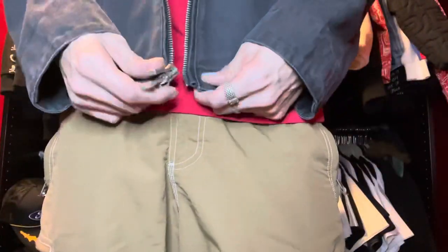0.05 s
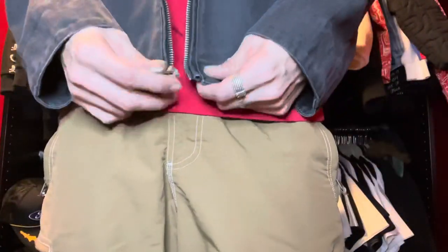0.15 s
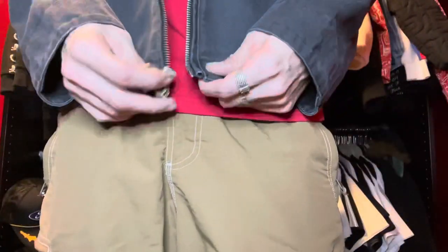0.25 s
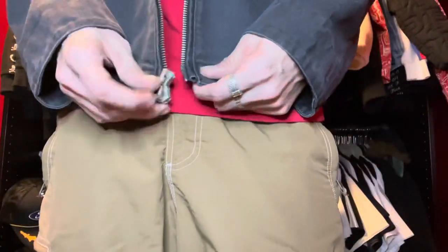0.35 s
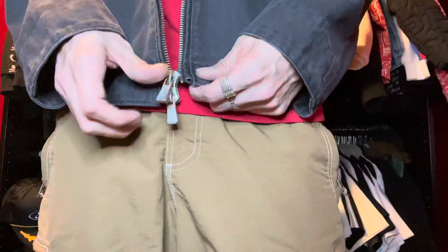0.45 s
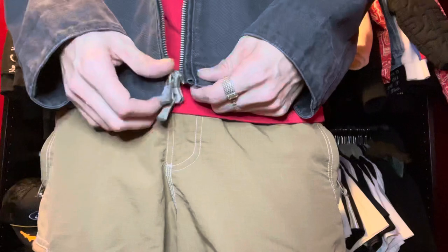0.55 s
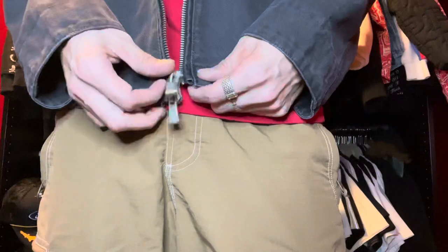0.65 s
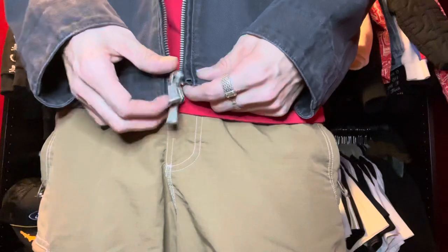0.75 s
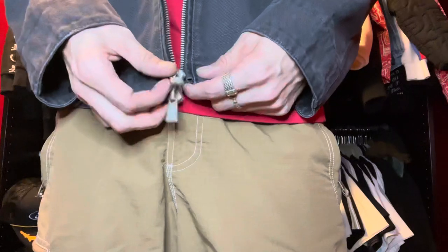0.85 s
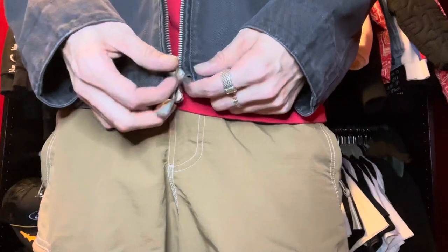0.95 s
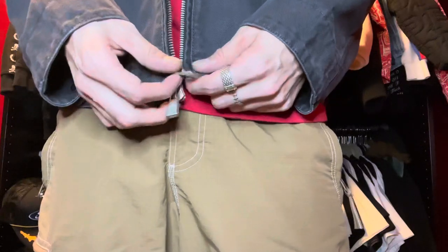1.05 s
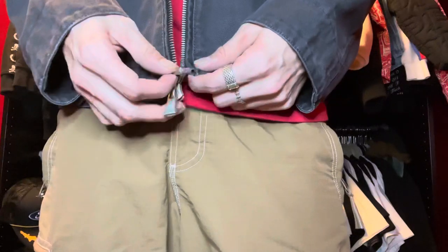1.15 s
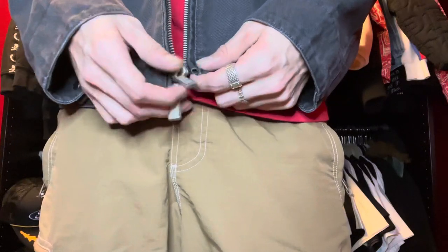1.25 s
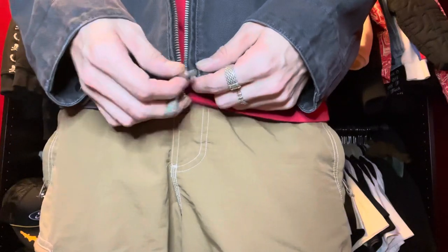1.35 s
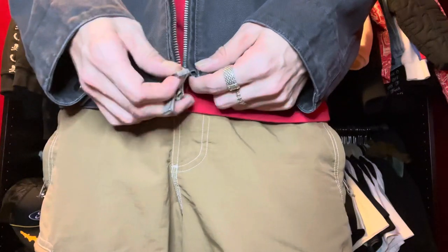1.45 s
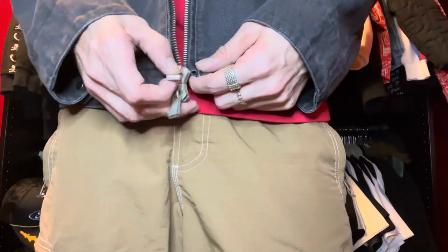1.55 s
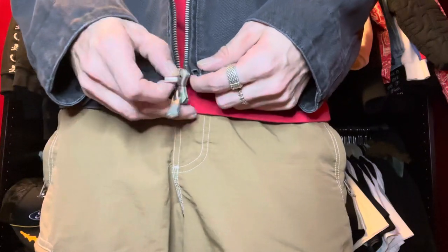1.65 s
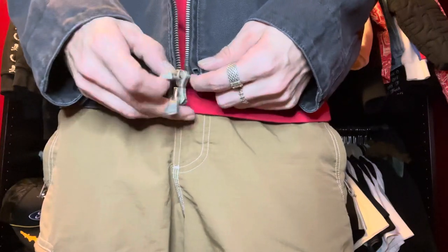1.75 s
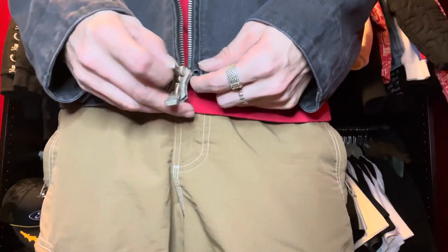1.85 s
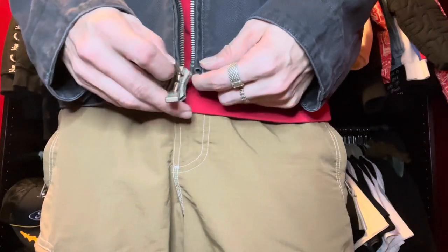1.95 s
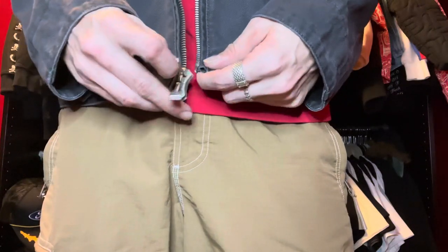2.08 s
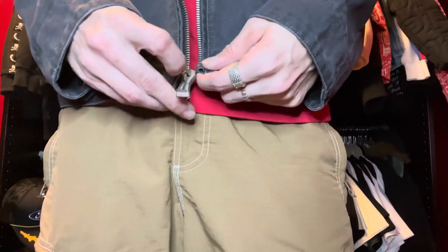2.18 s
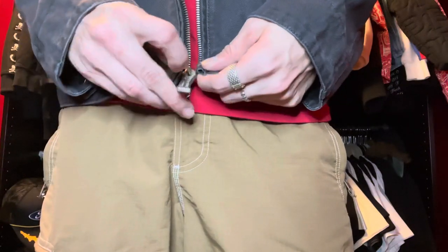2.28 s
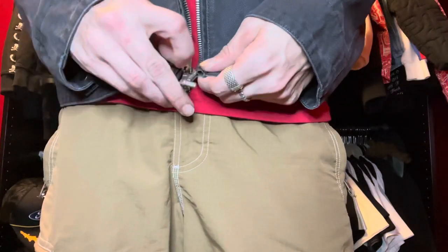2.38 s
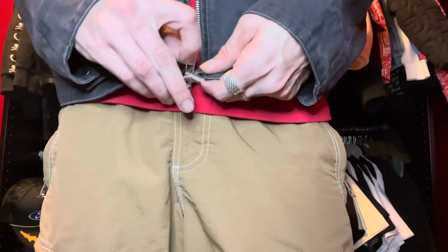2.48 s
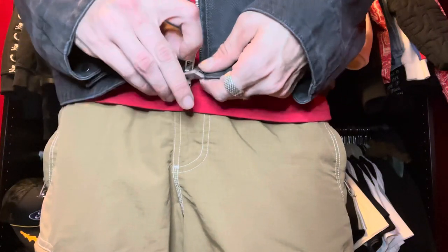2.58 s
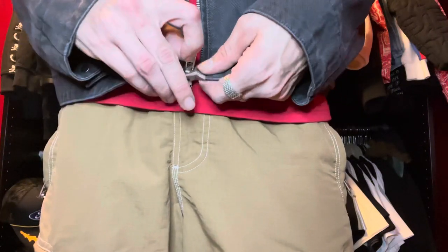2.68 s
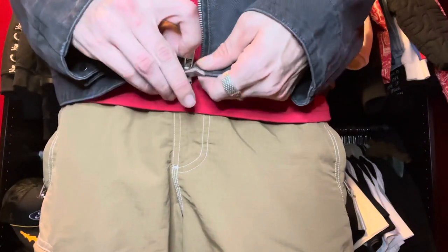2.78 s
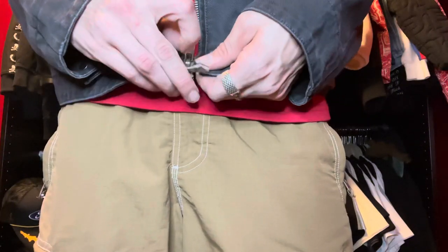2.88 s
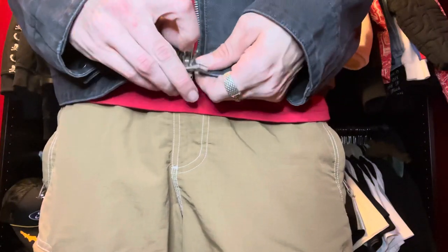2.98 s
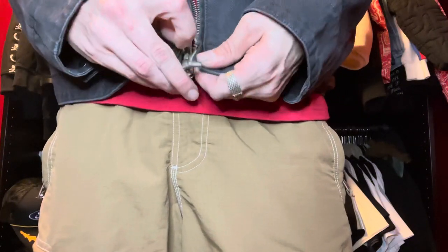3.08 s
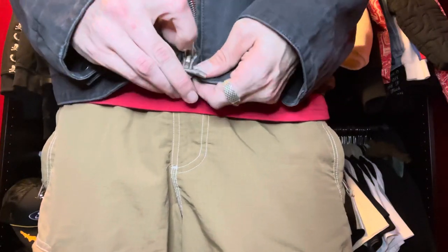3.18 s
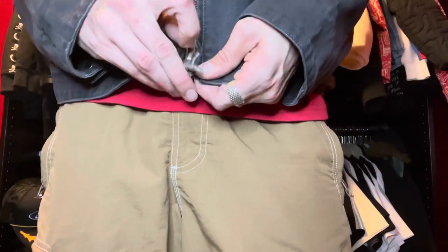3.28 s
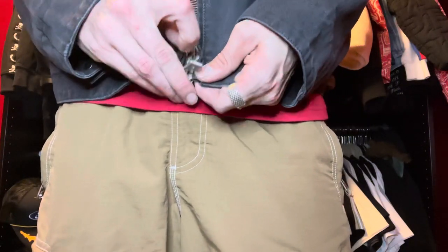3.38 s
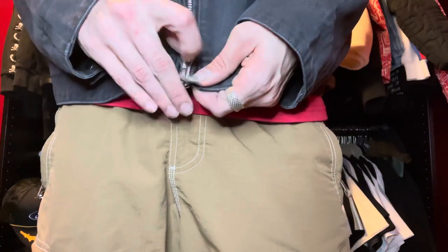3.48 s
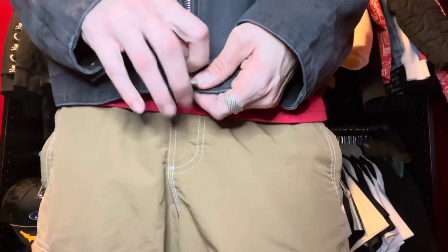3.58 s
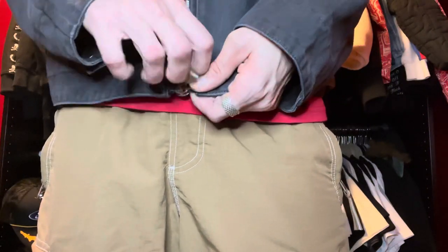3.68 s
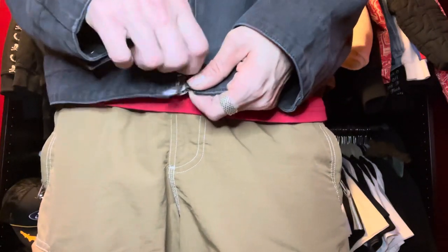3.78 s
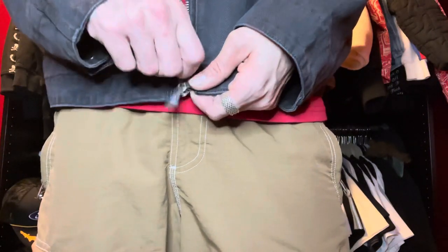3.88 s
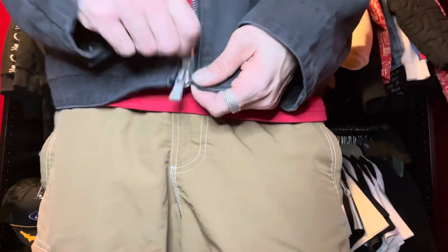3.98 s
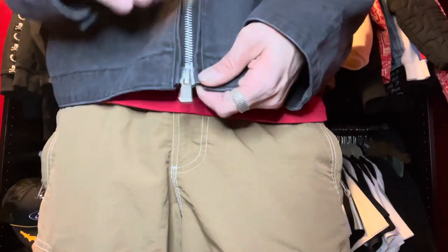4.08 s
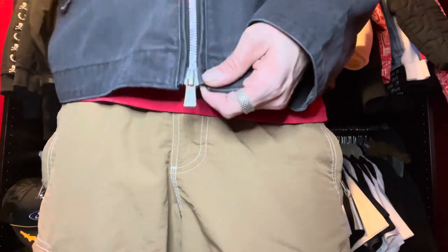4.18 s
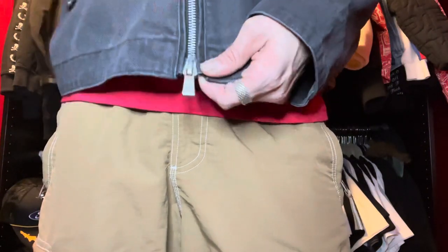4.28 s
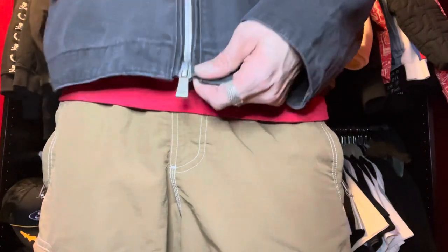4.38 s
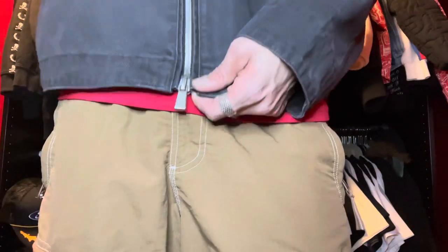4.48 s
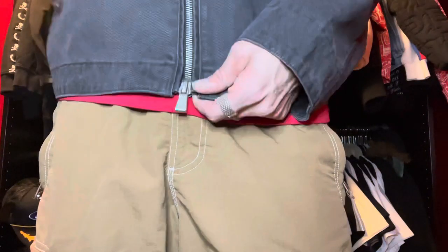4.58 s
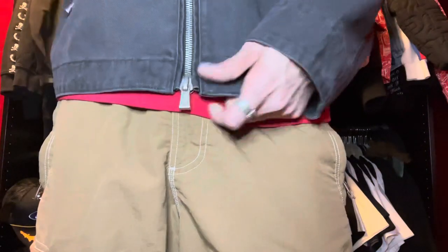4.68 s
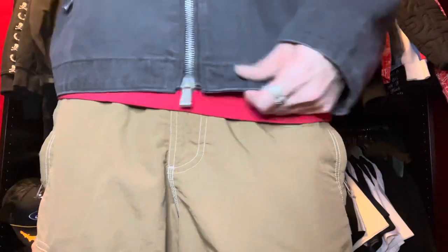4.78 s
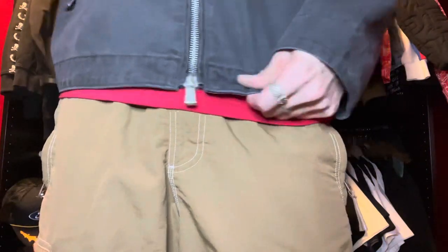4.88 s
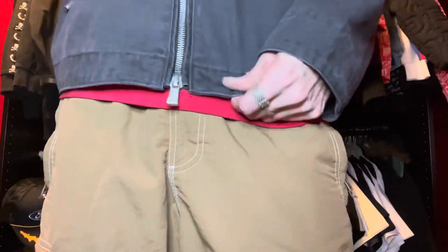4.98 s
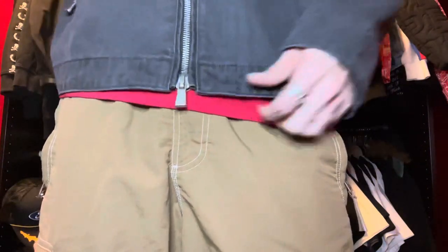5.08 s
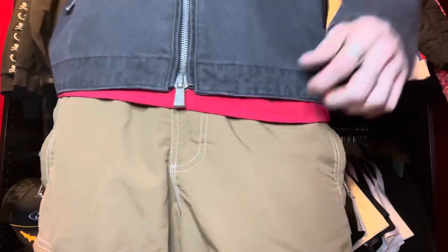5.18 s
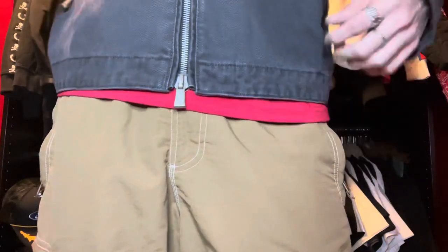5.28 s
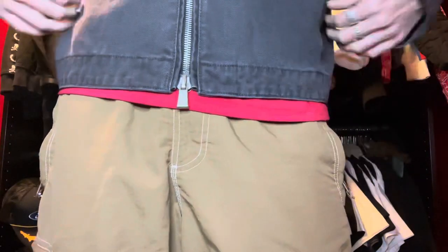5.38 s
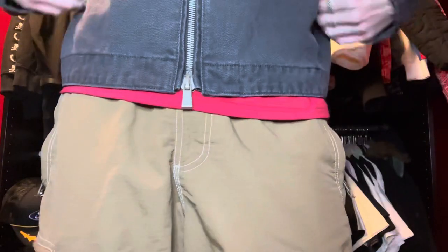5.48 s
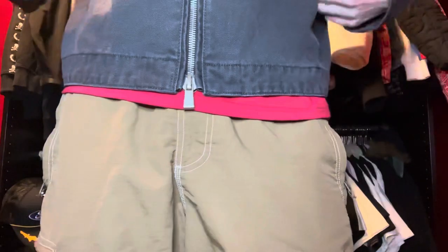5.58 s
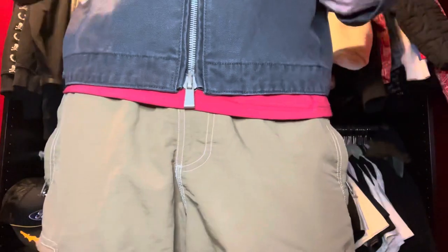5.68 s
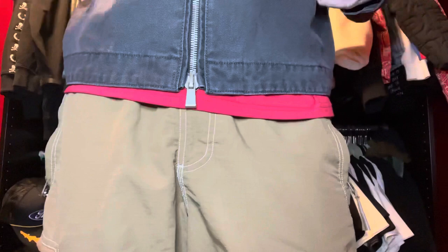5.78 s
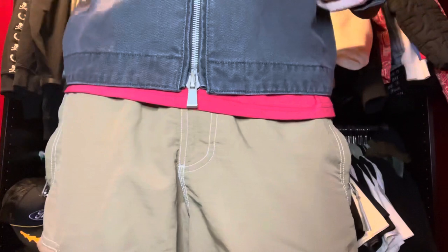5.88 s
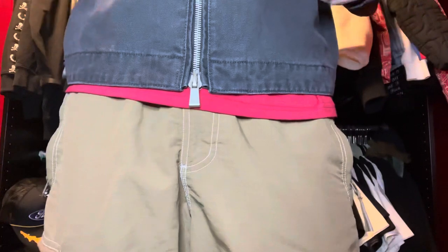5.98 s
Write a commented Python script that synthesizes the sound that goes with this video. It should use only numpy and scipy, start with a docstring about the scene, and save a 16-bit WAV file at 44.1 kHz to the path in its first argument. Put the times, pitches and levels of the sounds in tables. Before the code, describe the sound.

Small metal parts tick, snap and chatter against each other while heavy canvas rustles lightly. After a quiet stretch, blunt knocks and a firm click seat the pin, more clicks follow, and the zipper is pulled up in a single grainy buzz, the taut cloth droning under it. Hands then let go with brushing sleeves and soft hem flaps. Very close stereo microphone, dry indoor space, low rumble and faint hiss.

```python
"""A thick metal jacket zipper is pulled shut in one stroke: its teeth buzz through the taut canvas.
Each tooth pushes on the resonant canvas and tape and lets out a burst of filtered scraping noise.
Before and after, hands fit and settle the parts: pin, slider and pull tabs click as ringing modes.
Noise shaped by strokes makes sleeves rustle; knocks and scuffs set the canvas ringing.
A small, dead room with a low hum, heard by a close pair of microphone ports."""
import sys
import numpy as np
from scipy import signal
from scipy.fft import rfft, irfft
from scipy.io import wavfile
from scipy.ndimage import uniform_filter1d

SR = 44100
rng = np.random.default_rng(int(sys.argv[2]) if len(sys.argv) > 2 else 0)


def int16_out(signal):
    """Quantize to a 16-bit WAV file."""
    q = np.round(np.clip(np.atleast_2d(signal).T, -1, 1) * 32767)
    wavfile.write(sys.argv[1], SR, q.astype(np.int16))


N = 266540
TIME = np.arange(N) / SR


def amp(db):
    """Decibels to gain."""
    return 10 ** (np.asarray(db) / 20)


def unit(x):
    """Scales to an rms of 1."""
    return x / np.sqrt(np.mean(x ** 2) + 1e-20)


def struck(hit):
    """Scales a hit so that its energy, packed into 3 ms, has an rms of 1."""
    return unit(hit) * np.sqrt(.003 * SR / len(hit))


def read(points, hz):
    """Reads a table on a log-frequency axis."""
    f, value = np.transpose(points)
    return np.interp(np.log(hz + 1), np.log(f + 1), value)


def add(mix, s, sound):
    """Mixes a sound in at s seconds."""
    part = mix[max(round(s * SR), 0):][:len(sound)]
    part += sound[:len(part)]


def colour(x, points, size=4096):
    """Causal (minimum-phase) filter with the given spectrum."""
    log_gain = np.log(amp(read(points, abs(np.fft.fftfreq(size, 1 / SR)))))
    taps = np.fft.ifft(np.exp(np.conj(signal.hilbert(log_gain)))).real[:size // 2]
    return signal.fftconvolve(x, taps)[:len(x)]


def resonate(x, hz, width_hz):
    """One band-pass resonance of gain 1."""
    return signal.lfilter(*signal.iirpeak(hz, hz / width_hz, SR), x)


def resonate_twice(x, hz, width_hz):
    """The same resonance passed twice, for steeper sides."""
    return resonate(resonate(x, hz, width_hz), hz, width_hz)


def drift(per_s):
    """Smooth chance of rms 1, with per_s new values a second."""
    knots = rng.standard_normal(N // 8)
    return unit(np.interp(TIME * per_s, np.arange(len(knots)), knots))


def swells(rows):
    """Gain over time from bell-shaped swells."""
    return sum(amp(db) * np.exp(-.5 * ((TIME - s) / length) ** 2) for s, db, length in rows)


# spectrum of the still air: (frequency [Hz], level [dB])
AIR_SPECTRUM = [(20, 0), (40, -7), (58, 4.5), (100, -5.5), (160, -14.5), (280, -24), (550, -27),
                (1000, -30.5), (2000, -32.5), (4000, -41.5), (9000, -42), (16000, -69)]
HUM_HZ, HUM_DB = 87, -62


def background(air_db=-65, apart=0.82):
    """Low rumble with faint hiss, partly shared by both ports, and a slightly wavering hum."""
    shared, left, right = (unit(colour(rng.standard_normal(N), AIR_SPECTRUM)) for _ in range(3))
    air = amp(air_db) * (shared + apart * np.array([left, right]))
    phase = 2 * np.pi * np.cumsum(HUM_HZ + .8 * drift(6)) / SR
    hum = np.sin(phase) * amp(1.3 * drift(5))
    return air + amp(HUM_DB) * unit(hum)


# decay of the room: (frequency [Hz], time to fall 60 dB [s])
ROOM_DECAY = [(100, 0.51), (600, 0.17), (2000, 0.11), (6000, 0.14), (15000, 0.14)]


def room(x, first_s=.004):
    """Sparse reflections, quickly soaked up by hanging clothes."""
    taps = rng.choice([-1., 1.], (2, SR // 3)) * (rng.random((2, SR // 3)) < 4000 / SR)
    taps *= np.arange(SR // 3) > first_s * SR
    hz, t, z = signal.stft(taps, SR, nperseg=256)
    fade = amp(-60 * t / read(ROOM_DECAY, hz)[:, None])  # each band dies away at its own pace
    tail = signal.istft(z * fade, SR)[1]
    return signal.fftconvolve(x[None], tail / np.linalg.norm(tail[0]), axes=1)[:, :N]


def moving(x, echo, count=3, round_s=0.33):
    """The hands keep moving, so the sound passes in turn through a few different sets of reflections."""
    turn = TIME / round_s
    return sum(np.sqrt(2 / count) * echo(x * np.cos(np.pi * (turn + k / count))) for k in range(count))


def scatter(x):
    """Hands, sleeves and body throw sound back within milliseconds, in opposite polarity at the ports."""
    t, t60 = np.arange(SR // 50) / SR, .011
    taps = rng.standard_normal((2, len(t))) * amp(-60 * t / t60)
    taps = taps[0] - taps[1]
    echo = signal.fftconvolve(x, taps / np.linalg.norm(taps))[:N]
    return np.array([echo, -echo]) / np.sqrt(2)


# phase gap between the two ports: (frequency [Hz], lead of the left [rad])
PORT_LEAD = [(0, 0), (600, -.5), (2600, -.7), (4600, -1.5), (5500, -2.3), (5900, -4.2), (6700, -5.6),
             (7700, -6.1), (9700, -4.1), (10700, -3.25), (11700, -3.05), (12500, -2), (13900, -.3),
             (16000, 0)]


def ports(x):
    """Direct sound reaches the two ports with a phase gap that depends on frequency."""
    lead = np.interp(np.fft.rfftfreq(N, 1 / SR), *np.transpose(PORT_LEAD))
    return irfft(rfft(x) * np.exp(.5j * np.array([lead, -lead])), N)


# strokes of sleeves and hands over the jacket:
# (time of peak [s], brushing level [dB], heavy fold level [dB], rise [s], fall [s])
CLOTH_STROKES = [(0.11, -58.5, -67.5, 0.052, 0.11), (0.38, -62, -67, 0.014, .05),
                 (0.47, -52.5, -64, 0.016, 0.039), (0.66, -69.5, -65, 0.39, 0.26),
                 (0.9, -65, -75, 0.18, 0.14), (1.22, -71, -80, 0.45, .08), (1.85, -84, -80, 0.47, 0.14),
                 (2.43, -66.5, -72, 0.088, 0.066), (3.0, -69.5, -70, .05, .04),
                 (3.22, -67, -64.5, 0.037, 0.11), (3.45, -59, -63.5, 0.045, 0.31),
                 (3.765, -53, -62.5, 0.089, 0.015), (3.929, -59, -56, 0.045, 0.019),
                 (4.5, -67.5, -70.5, 0.14, 0.18), (4.739, -50, -56, 0.09, 0.049),
                 (4.81, -54.5, -53.5, 0.039, 0.093), (5.035, -50, -58.5, 0.053, 0.033),
                 (5.199, -61, -60.5, 0.058, 0.052), (5.33, -56.5, -55.5, 0.12, 0.085),
                 (5.47, -54, -56.5, 0.062, .15), (5.729, -53.5, -54, 0.072, 0.019),
                 (5.859, -53.5, -55, 0.039, 0.038), (5.97, -56.5, -57, 0.081, 0.18)]
# spectrum of canvas brushing on canvas: (frequency [Hz], level [dB])
BRUSH_SPECTRUM = [(300, -2.5), (900, 2), (2000, 6.5), (3500, 2), (7000, 1.5), (9400, -1.5), (12500, -3.5),
                  (16000, -7)]
# spectrum of shifting folds: (frequency [Hz], level [dB])
FOLD_SPECTRUM = [(40, -6), (130, -8), (300, -13.5), (520, 11), (750, 1), (1100, 2.5), (2000, -7),
                 (5000, -30)]
STROKE_ROUNDNESS = 0.96  # 1 is a pointed swell, 2 a bell


def cloth(flutter_db=2.5, crumple_db=3, snags_per_s=220, snag_size=0.4):
    """With each stroke canvas brushes on canvas, single threads snag, and heavy folds shift."""
    brush_power, fold_power, t = 0, 0, TIME[::64]
    for s, brush_db, fold_db, rise, fall in CLOTH_STROKES:
        swell = np.exp(-np.maximum((s - t) / rise, (t - s) / fall) ** STROKE_ROUNDNESS)
        brush_power += (amp(brush_db) * swell) ** 2
        fold_power += (amp(fold_db) * swell) ** 2
    snags = rng.standard_normal(N) * rng.exponential(1, N) * (rng.random(N) < snags_per_s / SR)
    rub = rng.standard_normal(N) + snag_size * unit(snags)
    brush = unit(colour(rub * amp(flutter_db * drift(90)), BRUSH_SPECTRUM))
    folds = unit(colour(rub * amp(crumple_db * drift(110)), FOLD_SPECTRUM))
    brush_gain = np.interp(TIME, t, np.sqrt(brush_power))
    fold_gain = np.interp(TIME, t, np.sqrt(fold_power))
    return brush * brush_gain + folds * fold_gain


# the heavy hem is tugged or flaps: (time of peak [s], level [dB], length of bell [s])
HEM_FLAPS = [(4.1, -49, 0.045), (4.33, -52.5, 0.069), (4.81, -58.5, 0.046), (5.305, -53, 0.02),
             (5.35, -59.5, 0.051), (5.75, -50, 0.026), (5.97, -57.5, 0.027)]


def flaps(hz=105, width_hz=130):
    """Heavy cloth pushes a soft puff of air."""
    return swells(HEM_FLAPS) * unit(resonate_twice(rng.standard_normal(N), hz, width_hz))


# fingers and cuffs scuff the jacket:
# (time of peak [s], level [dB], length of bell [s], pitch of the cloth under them [Hz])
JACKET_SCUFFS = [(0.385, -56.5, 0.02, 807), (0.48, -56.5, 0.022, 835), (0.67, -60.5, 0.016, 894),
                 (1.80, -73, 0.018, 1040), (1.91, -78.5, .023, 1740), (2.42, -69.5, 0.046, 874),
                 (2.812, -55, 0.011, 860), (3.09, -51, 0.0047, 840), (3.205, -61, 0.0084, 920),
                 (3.234, -50, .007, 1700), (4.76, -59, 0.024, 910), (4.815, -48.5, 0.019, 580),
                 (5.728, -47.5, 0.013, 1540), (5.748, -43.5, 0.0044, 1410), (5.862, -45.5, 0.0044, 510),
                 (5.962, -53, 0.017, 1140), (5.97, -50.5, 0.02, 508)]
# spectrum of a blunt contact on canvas, for scuffs and knocks: (frequency [Hz], level [dB])
THUD_SPECTRUM = [(40, -11), (130, -2), (300, -8), (520, 8.5), (1000, 0), (2000, -8.5), (4000, -14.5),
                 (9000, -18.5)]


def scuffs(crumple_db=5.5, width_share=0.085, plain_db=-3):
    """Skin and cloth drag briefly over the canvas, which rings according to its tension."""
    t = np.arange(SR // 4) / SR - 1 / 8
    out, flutter = np.zeros(N), amp(crumple_db * drift(200))
    for k, (s, db, length, hz) in enumerate(JACKET_SCUFFS):
        drag = rng.standard_normal(len(t)) * flutter[k * len(t):][:len(t)]
        ringing = unit(resonate(drag, hz, hz * width_share))
        plain = unit(colour(drag, THUD_SPECTRUM))
        rub = unit(ringing + amp(plain_db) * plain)
        add(out, s + t[0], amp(db) * np.exp(-.5 * (t / length) ** 2) * rub)
    return out


# blunt knocks of fingers, slider and hem on the canvas:
# (time [s], level [dB], drum pitch [Hz], time for the scuff to fall 60 dB, at least 0.005 [s])
CANVAS_KNOCKS = [(0.457, -48, 640, 0.05), (1.746, -65.5, 470, .05), (2.082, -56, 810, 0.15),
                 (2.808, -48.5, 564, 0.12), (2.826, -48.5, 546, .02), (3.002, -60, 530, .08),
                 (3.088, -43, 910, 0.03), (3.1, -40, 984, 0.072), (3.226, -49, 930, 0.075),
                 (3.237, -39, 614, .022), (5.302, -41, 640, 0.035), (5.63, -57, 980, 0.022),
                 (5.724, -47, 1130, .025), (5.746, -40, 493, 0.035), (5.858, -48.5, 510, 0.038)]


def knocks(drum_width_hz=100, drum_db=2, snap_db=-3, snap_s=0.0064):
    """A blow snaps, scuffs and sets a patch of canvas drumming for a few cycles."""
    out, t = np.zeros(N), np.arange(SR // 8) / SR
    for s, db, hz, t60 in CANVAS_KNOCKS:
        scuff, snap = rng.standard_normal((2, len(t))) * amp(-60 * t / [[max(t60, .005)], [snap_s]])
        drum = np.sin(2 * np.pi * hz * t) * np.exp(-np.pi * drum_width_hz * t)
        blow = struck(colour(scuff, THUD_SPECTRUM))
        blow += amp(snap_db) * struck(colour(snap, THUD_SPECTRUM))
        blow += amp(drum_db) * struck(drum)
        add(out, s, amp(db) * blow)
    return out


# loose teeth graze the slider: (time of peak [s], level [dB], length of bell [s])
TOOTH_GRAZES = [(0.375, -54, 0.031), (0.47, -46, 0.014), (0.59, -56, .015), (0.825, -58, 0.0075),
                (0.88, -52.5, 0.009), (1.16, -59, 0.0056), (3.46, -62, 0.018), (3.56, -57.5, 0.0059),
                (3.72, -61, 0.031), (3.95, -48.5, 0.01)]
# modes of slider and pull tabs, for grazes and clicks, before the fingers damp and detune them:
# (frequency [Hz], level [dB], time to fall 60 dB [s])
METAL_MODES = [(3600, -10, 0.013), (5490, 3.5, 0.019), (6030, -8, 0.015), (7740, -16, 0.052),
               (8500, -15, 0.015), (8860, -10, 0.02), (9970, -11.5, 0.053), (12080, 1.5, 0.032),
               (12510, -3, 0.044), (14300, -24, 0.068), (15300, -29, 0.01)]
# spectrum of a metal contact, for grazes and clicks: (frequency [Hz], level [dB])
TICK_SPECTRUM = [(200, -20.5), (600, 5), (2000, -18), (4000, 5), (7000, -4), (9500, 9.5), (13000, 3.5),
                 (16000, 3)]


def grazes(ticks_per_s=500):
    """Many tiny metal ticks run together into a scratch."""
    ticks = rng.standard_normal(N) * (rng.random(N) < ticks_per_s / SR)
    ring = sum(amp(db) * resonate(ticks, hz, 8 / t60) for hz, db, t60 in METAL_MODES)
    return swells(TOOTH_GRAZES) * unit(unit(colour(ticks, TICK_SPECTRUM)) + 0.9 * unit(ring))


# metal touching metal: (time [s], level [dB], centre of the favoured ringing [Hz], low clack level [dB],
# ring level, high when the part hangs loose [dB]); clack and ring are relative to the click
METAL_CLICKS = [(0.0787, -39.5, 16000, -3.5, 0), (0.1349, -42.5, 14100, -35, -12),
                (0.144, -38.5, 5850, -17, -5), (0.2038, -41, 9800, -23, -12),
                (0.2929, -45.5, 13600, -24, -39), (0.3424, -39.5, 7150, -33, -3),
                (0.3573, -36.5, 6700, -14, -6), (0.3704, -36.5, 9500, -25, -4),
                (0.395, -38.5, 8600, -21, -6), (0.414, -44, 3830, -9, -13), (0.4457, -39, 9000, -24, -11),
                (0.4626, -42.5, 9600, -23, 4.5), (0.4742, -39.5, 4220, -32, -27),
                (0.6057, -43.5, 8900, -14.5, -19), (0.6364, -44.5, 8750, -12.5, 1),
                (0.6664, -36, 6200, -20, -6), (0.7016, -49, 8750, -12, -1),
                (0.7688, -42.5, 8100, -12, -1.5), (1.1881, -41, 12800, -20, 4.5),
                (1.2411, -47, 5900, -21, 5), (1.2955, -41.5, 13000, -15, -8),
                (1.2995, -38.5, 7300, -18, -7), (1.4857, -50.5, 4340, -5.5, -12),
                (1.59, -48, 13000, -23, 1), (1.6298, -41, 9500, -8, -17), (1.8487, -71, 15000, -13, -6),
                (1.941, -69, 9900, -10, 5), (2.0822, -54.5, 9900, -12, -1), (2.1185, -56, 8900, -9.5, -22),
                (2.807, -60, 3470, -8, -6), (2.8256, -48.5, 7700, -10, -19),
                (3.1017, -42.5, 4740, -10, -24), (3.1245, -49.5, 7100, -1.5, -1.5),
                (3.237, -32, 5570, -7.5, -35), (3.412, -56, 3830, 4, -2), (3.431, -57, 3540, 9.5, 0),
                (3.4979, -54.5, 3520, 3, -1), (3.6067, -47, 3330, -6.5, -2.5),
                (3.6407, -39.5, 10500, -24, -14), (3.6512, -53.5, 12200, -5, 11.5),
                (3.7025, -41, 8630, -28, -2), (3.7122, -53, 8440, -8, -24), (3.7506, -42.5, 8160, -10, -12),
                (3.8681, -35.5, 9200, -32, -5), (3.9096, -43.5, 7500, -10, -11),
                (3.9625, -39.5, 7760, 1.5, 0.5), (3.973, -39, 12200, -19, 3), (4.404, -57, 12800, -5, -15),
                (4.596, -50.5, 9870, -11, 0), (4.7873, -39.5, 8700, -10, -5.5),
                (5.4884, -51, 4250, -10, -13), (5.6999, -49.5, 3920, 1.5, -6)]
# a loose part chatters longer than one held tight: length at 0 dB of ring, dB of ring that double it
CHATTER_S, CHATTER_DOUBLES_DB = 0.027, 15.5


def clicks(clack_hz=2200, clack_width_hz=2400, focus_db=14, focus_octaves=0.26, rise_s=0.00038,
           vary_db=3, detune=0.023, free_db=-3, snap=3.9, bright=.9, slide_db=-13, slide_s=0.00075):
    """Each contact snaps, chatters briefly and rings the modes nearest to where it lands."""
    out, t = np.zeros(N), np.arange(SR // 8) / SR
    for s, db, hz, clack_db, ring_db in METAL_CLICKS:
        chatter = CHATTER_S * 2 ** (ring_db / CHATTER_DOUBLES_DB)
        force = rng.standard_normal(len(t)) * amp(-60 * t / chatter) * (1 - np.exp(-t / rise_s))
        force[SR // 1000] += snap  # the edges graze, then seat with one hard impulse
        edge = bright * amp(.5 * min(ring_db, 0)) * unit(resonate(force, hz, hz / 4))
        tick = unit(colour(force, TICK_SPECTRUM)) + edge
        clack = resonate_twice(force, clack_hz, clack_width_hz)
        loose = amp(min(ring_db - free_db, 0))  # a part held tight rings weakly and stops early
        ring = 0
        chances = rng.standard_normal((len(METAL_MODES), 3))
        for (f, mode_db, t60), (touch, shift, phase) in zip(METAL_MODES, chances):
            near = np.exp(-(np.log2(f / hz) / focus_octaves) ** 2)
            # fingers damp and detune the modes differently each time
            level_db = mode_db + focus_db * near + vary_db * touch
            fade_db = level_db - 60 * t / (t60 * loose * (.5 + .5 * near))
            ring += amp(fade_db) * np.sin(2 * np.pi * (f * t * (1 + detune * shift) + phase))
        click = struck(tick) + amp(ring_db) * struck(ring) + amp(clack_db) * struck(clack)
        add(out, s, amp(db) * click)
        # the parts slide into contact: noise that grows up to the click
        slide = (rng.standard_normal(len(t)) * np.exp(-t / slide_s))[SR // 50::-1]
        add(out, s - len(slide) / SR, amp(db + slide_db) * struck(colour(slide, TICK_SPECTRUM)))
    return out


# speed of the slider, before jitter: (time [s], speed [teeth per second])
SLIDER_SPEED = [(3.945, 18.5), (3.965, 227), (4.045, 287), (4.09, 475), (4.19, 700), (4.29, 520),
                (4.35, 310), (4.40, 227), (4.425, 61), (4.48, 14)]
# the slider catches on the tape and the taut canvas drums louder:
# (time of peak [s], level [dB], fall of the half bell [s])
TAPE_DRAGS = [(4.037, -35.5, 0.016), (4.072, -37, .022), (4.106, -25, 0.015), (4.235, -30.5, 0.016),
              (4.278, -30, 0.016), (4.357, -33.5, 0.019), (4.401, -45.5, 0.012)]
# resonances of the taut jacket front: (frequency [Hz], width of each of two passes [Hz], level [dB])
CANVAS_MODES = [(521, 175, 1.5), (696, 310, -10.5)]
# resonances of the slider on its tape: (frequency [Hz], width of each of two passes [Hz], level [dB])
TAPE_MODES = [(960, 600, -1.5), (1470, 220, 0.5), (1865, 380, -5.5), (2530, 1030, -8), (2890, 280, -12)]
# spectrum of teeth sliding through the slider: (frequency [Hz], level [dB])
SCRAPE_SPECTRUM = [(60, -25), (130, -8), (250, 1), (700, 11), (2000, 5), (4000, 1.5), (6500, 0),
                   (8500, 3.5), (10000, 11), (12200, -1), (14000, 8), (16000, -6.5)]
# scraping, drumming canvas and rattling tape, one row each: (level at a brisk speed [dB],
# gain per doubling of speed [dB], loss as the slider climbs to the collar [dB])
SCRAPE_PULL = (-32, 6.9, 6.4)
CANVAS_PULL = (-35.5, 6.9, 9)
RATTLE_PULL = (-35.5, 6.5, 8.2)
BRISK_TEETH_PER_S, DRAG_RISE_S = 600, 0.0049


def zipper(canvas_grit=0.53, tape_grit=0.21, wobble_db=2.0, jitter=.05, uneven_db=2.5, grip=.3, slide=.36):
    """Tooth after tooth snaps into the slider: a push on the canvas and a scrape, louder with speed."""
    speed = np.interp(TIME, *np.transpose(SLIDER_SPEED), left=0, right=0)
    speed = np.maximum(speed, 1e-6)
    teeth = np.cumsum(speed * (1 + jitter * drift(500))) / SR
    tooth = teeth.astype(int)
    size = amp(uneven_db * rng.standard_normal(N)[tooth])

    def pull(db, doubling_db, climb_db):
        """Gain that grows with the slider's speed and fades as it moves up and away."""
        speed_db = doubling_db * np.log2(speed / BRISK_TEETH_PER_S)
        return amp(db + speed_db - climb_db * teeth / teeth[-1])

    def steady(x, size=700):
        """Evens out the slow level, so that the pull alone sets it."""
        return x / np.sqrt(abs(uniform_filter1d(x ** 2, size)) + 1e-12)

    def through(x, modes):
        """A body with steep-sided resonances that ring one after another."""
        rings = (amp(db) * resonate_twice(x, hz, width) for hz, width, db in modes)
        return steady(sum(np.roll(ring, k * SR // 1500) for k, ring in enumerate(rings)))

    new_tooth = np.diff(tooth, prepend=0) > 0
    pushes = steady(size * new_tooth, size=4000) * np.sqrt(speed / BRISK_TEETH_PER_S)
    burst = slide + np.exp(-(teeth % 1) / grip)  # strongest as each tooth enters
    grit = steady(size * burst * rng.standard_normal(N), size=4000)
    drags = 0
    for s, db, fall in TAPE_DRAGS:
        drags += amp(db) * np.exp(-.5 * ((TIME - s) / np.where(TIME < s, DRAG_RISE_S, fall)) ** 2)
    scrape = pull(*SCRAPE_PULL) * steady(colour(grit, SCRAPE_SPECTRUM))
    canvas = (pull(*CANVAS_PULL) + drags) * through(pushes + canvas_grit * grit, CANVAS_MODES)
    wobble = amp(wobble_db * drift(110))
    rattle = pull(*RATTLE_PULL) * wobble * through(pushes + tape_grit * grit, TAPE_MODES)
    return scrape + canvas + rattle


# share of the sound that is scattered sideways: (frequency [Hz], level [dB])
SIDEWAYS_SHARE = [(100, -16), (500, -10), (1200, -7), (2500, -4.5), (5000, -6), (8500, -10), (11000, -22),
                  (15000, -17)]


def scene():
    """Zipper and cloth close to the ports; reflections come from the front and from all around."""
    near = cloth() + flaps() + scuffs() + knocks() + grazes() + clicks() + zipper()
    front = amp(-20) * room(near)[0]
    sideways = colour(near, SIDEWAYS_SHARE)
    around = scatter(sideways) + amp(1.0) * moving(sideways, room)
    return background() + around + ports(near + front)


EDGE_HZ = 16100


def record(dry, low_cut_hz=36):
    """The recorder's low cut and band limit."""
    cut = signal.sosfilt(signal.butter(2, low_cut_hz, "high", fs=SR, output="sos"), dry)
    band_limit = signal.firwin(255, EDGE_HZ, window=("kaiser", 8), fs=SR)
    return signal.oaconvolve(cut, band_limit[None], "same")


dry = scene()
out = record(dry)
int16_out(out)
```